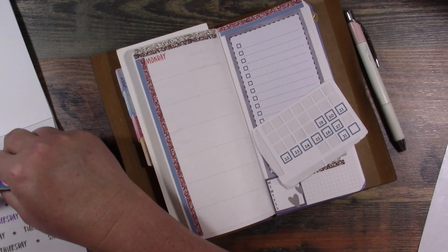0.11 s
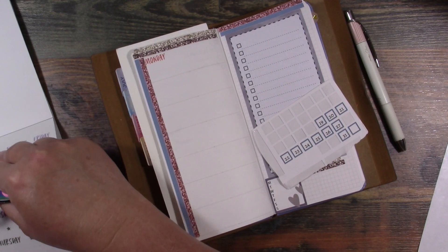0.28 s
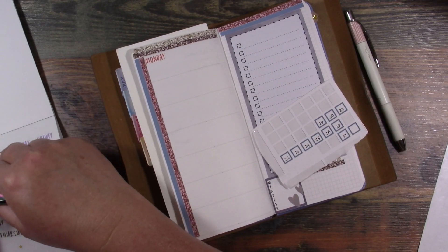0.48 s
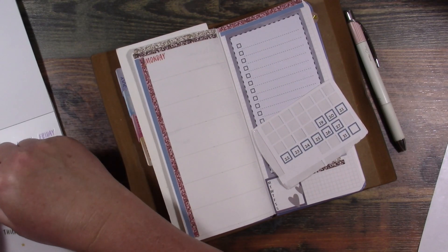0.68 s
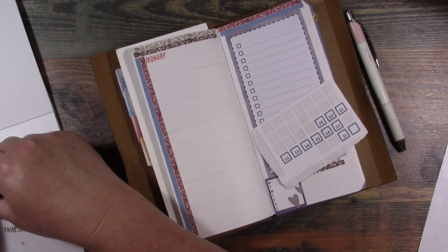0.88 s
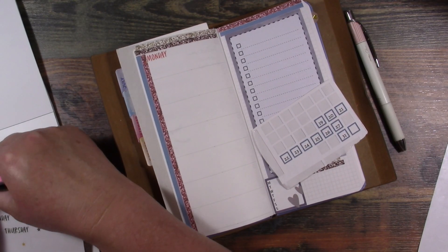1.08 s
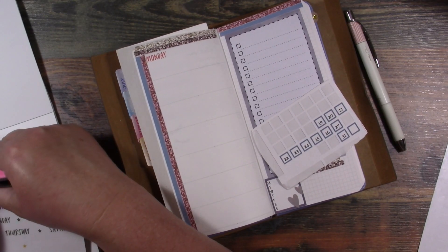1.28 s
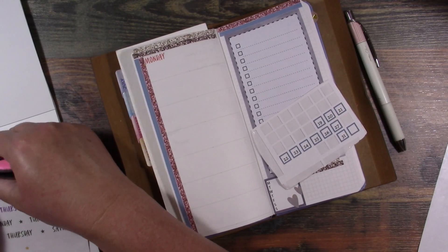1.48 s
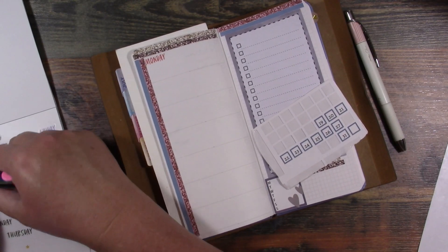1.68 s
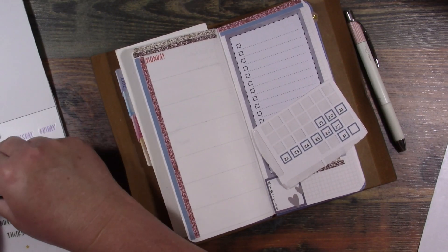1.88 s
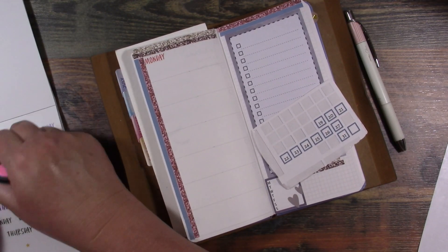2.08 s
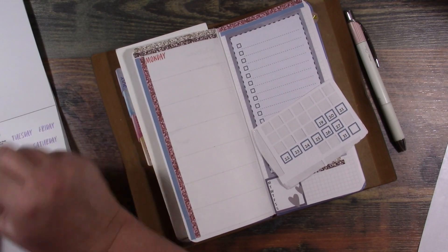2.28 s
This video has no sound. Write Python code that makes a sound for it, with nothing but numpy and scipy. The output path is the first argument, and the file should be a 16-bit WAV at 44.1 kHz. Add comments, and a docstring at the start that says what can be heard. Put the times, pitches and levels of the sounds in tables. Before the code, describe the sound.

Close paper handling at a desk: a few woody thumps first, faint rustling, then small crackly peels

```python
"""A small quiet room: at a wooden desk a hand works close by at paper and a padded book.
Knocks are short swelling tones with a noisy edge; they echo and ring the desk top.
Between them fingers rub and paper hisses, both made of filtered random grains and noise.
Paper snaps are bright noise bursts; a paper edge sings as it drags and glue lets go in tiny clicks.
Presses of the hand wake low tones under the desk, and a steady room tone lies below it all."""
import sys
import numpy as np
from scipy import signal
from scipy.fft import rfft, irfft
from scipy.io import wavfile

SR = 44100
rng = np.random.default_rng(int(sys.argv[2]) if len(sys.argv) > 2 else 0)


def volts(x):
    """Linear amplitude factor 10**(x/20) for a level x in dB, scalar or array-like."""
    e = np.asarray(x, float) / 20
    return 10 ** e


def wrap_up_sound(samples):
    """Save the sound to the file named by the first command line argument, as 16-bit audio."""
    columns = np.atleast_2d(samples).T
    # keep every value between -1 and 1, then stretch to whole-number steps
    tamed = np.clip(columns, -1, 1)
    steps = np.round(tamed * 32767).astype(np.int16)
    wavfile.write(sys.argv[1], SR, steps)


N = 101430  # length of the scene in samples


def read(points, hz):
    """Looks up a table between its points, with pitch on a log scale."""
    f, value = np.transpose(points)
    return np.interp(np.log(hz + 1), np.log(f + 1), value)


def evened(x):
    """Scales a sound to an average (rms) strength of 1."""
    return x / np.sqrt(np.mean(x ** 2) + 1e-20)


def colour(x, points):
    """Makes each pitch louder or softer, following a table of (pitch, level)."""
    size = x.shape[-1]
    gain = volts(read(points, np.fft.rfftfreq(size, 1 / SR)))
    return irfft(rfft(x) * gain, size)


def add(mix, s, sound):
    """Mixes a sound in at time s."""
    part = mix[round(s * SR):][:len(sound)]
    part += sound[:len(part)]


def grains(per_s, spread_db):
    """Random single-sample clicks of uneven strength, about per_s of them each second."""
    uneven = volts(spread_db * np.minimum(rng.exponential(1, N), 3))
    present = rng.random(N) < per_s / SR
    return rng.standard_normal(N) * uneven * present


# the tones in which the desk top rings:
# (pitch [Hz], level against the other tones [dB], time to fade by 60 dB [s])
DESK_TONES = [(407.6, 3.5, 0.044), (563, 2.5, 0.047), (692, -11.5, 0.2), (813, 6.5, 0.058),
              (1012, 8.5, 0.035), (1177, -9, 0.055), (1237, -0.5, 0.11), (1455, -4.5, 0.16),
              (1666, 8, 0.055), (1880, 11, 0.026), (2296, 6.5, 0.042)]


def desk(x):
    """Whatever pushes the desk top rings the same wooden tones, which then fade."""
    t = np.arange(SR // 4) / SR
    ring = sum(volts(db - 60 * t / fade) * np.sin(2 * np.pi * hz * t) for hz, db, fade in DESK_TONES)
    return signal.fftconvolve(x, ring / np.linalg.norm(ring))[:N]


# loudness of the sliding fingers: (time [s], level of the rub [dB], level of the paper hiss [dB])
SLIDE = [(0, -58, -57), (.1, -59.5, -60.5), (0.166, -62, -53.5), (0.2, -80, -55), (0.273, -56, -53.5),
         (0.311, -60.5, -68.5), (0.488, -56, -56), (.58, -51.5, -50), (0.658, -51, -66), (.92, -89, -64.5),
         (0.968, -52, -69), (1.04, -51.5, -63.5), (1.15, -52.5, -62.5), (1.22, -62.5, -69),
         (1.38, -59, -64), (1.45, -54.5, -57), (1.6, -74, -62.5), (1.65, -57, -58), (1.72, -94, -64.5),
         (1.8, -56, -61), (1.97, -59, -69.5), (2.12, -56, -54.5), (2.17, -58, -66.5), (2.3, -71, -61.5)]
# colour of the rub before the desk rings: (pitch [Hz], relative level [dB per Hz])
RUB_COLOUR = [(200, -10), (400, 3), (800, 2), (1600, 0), (2500, -5.5), (4000, -30.5)]
# colour of the hiss: (pitch [Hz], relative level [dB per Hz])
HISS_COLOUR = [(880, -48), (1500, -9.5), (2250, -10.5), (6760, -16), (11800, -22), (16000, -40)]


def sliding():
    """Small slips of skin on paper: a dull rub into the desk and a fine hiss."""
    s, rub_db, hiss_db = np.transpose(SLIDE)
    t = np.arange(N) / SR
    slips = grains(per_s=3400, spread_db=4.5)
    rub = evened(colour(slips, RUB_COLOUR))
    rub = evened(rub + evened(desk(rub)))  # rub and desk ring in equal parts
    hiss = evened(colour(rng.standard_normal(N) + 0.56 * evened(slips), HISS_COLOUR))
    return volts(np.interp(t, s, rub_db)) * rub + volts(np.interp(t, s, hiss_db)) * hiss


# colour of the room tone: (pitch [Hz], relative level [dB per Hz])
AIR_COLOUR = [(20, -33), (146, -11), (216, -5.5), (513, -6), (802, -10), (949, -11), (1330, -17.5),
              (2080, -23), (16000, -50.5)]
# how alike the left and right room tones are: (pitch [Hz], likeness [0 to 1])
LIKENESS = [(60, 0.81), (250, 0.75), (1000, 0.77), (4000, 0.48), (15000, 1)]


def air():
    """Steady room tone: filtered noise, partly shared by left and right."""
    level_db = -55
    a, b = rfft(rng.standard_normal((2, N)))
    same = np.clip(read(LIKENESS, np.fft.rfftfreq(N, 1 / SR)), -1, 1)
    right = same * a + np.sqrt(1 - same ** 2) * b
    pair = irfft(np.array([a, right]), N)
    return volts(level_db) * evened(colour(pair, AIR_COLOUR))


# how fast the room falls silent: (pitch [Hz], time to fade by 60 dB [s])
ROOM_FADE = [(250, 0.31), (660, 0.21), (1740, 0.27), (4590, 0.28), (12000, 0.083)]


def room(x):
    """Scattered reflections of random sign, each pitch range dying at its own speed."""
    start_s, spacing, width = 0.006, 40, 1  # first reflection, samples per reflection, stereo width
    taps = np.zeros((2, SR // 2))
    at = np.arange(round(start_s * SR), SR // 2 - spacing, spacing)
    at = at + rng.integers(0, spacing, (2, len(at)))
    np.put_along_axis(taps, at, rng.choice([-1., 1.], at.shape), 1)
    hz, t, z = signal.stft(taps, SR, nperseg=128)
    fading = volts(-60 * t / read(ROOM_FADE, hz)[:, None])
    mid, side = signal.istft(z * fading, SR, nperseg=128)[1]
    tail = np.array([mid + width * side, mid - width * side])
    return signal.fftconvolve(x[None], tail / np.linalg.norm(tail[0]), axes=1)[:, :N]


# knocks and snaps; the levels are before the gains added below:
# (time [s], low thud [dB], middle knock [dB], high clack [dB], hard edge [dB])
KNOCKS = [(0.2128, -32, -41.5, -66, -83), (0.2219, -39, -37.5, -40.5, -44), (0.2441, -21, -28, -40.5, -72),
          (0.397, -20.5, -24.5, -25, -54), (.4695, -77, -47.5, -52, -52), (0.6065, -13, -20, -23.5, -37),
          (0.7712, -23.5, -21.5, -14, -27.5), (.955, -48, -49, -48, -59), (.941, -55, -52.5, -51, -71),
          (1.034, -47, -51, -44, -46), (1.1425, -49, -48, -42.5, -50.5), (1.408, -32.5, -34.5, -31.5, -72),
          (1.739, -64, -61, -49, -58), (1.773, -41.5, -48.5, -45, -75), (1.9845, -48, -60, -49, -70),
          (2.0069, -44.5, -45, -34, -54), (2.022, -36.5, -37, -35.5, -44), (2.0552, -43, -42.5, -37.5, -54),
          (2.1325, -44, -46, -40, -64), (2.1365, -34.5, -39.5, -36.5, -56)]
# the three broad tones of a blow on the padded book: (pitch [Hz], cycles to swell [count], gain [dB])
BLOW_TONES = [(414.4, 0.42, 4.5), (779, 0.65, 12.5), (1493, 0.7, 12)]


def blows():
    """Each broad tone swells and dies at once; a high-pass keeps the bass low, as a small microphone would."""
    out, t = np.zeros(N), np.arange(1500) / SR
    for k, (hz, cycles, gain_db) in enumerate(BLOW_TONES):
        u = t * hz / cycles  # the swell peaks at u = 1
        swell = (u * np.exp(1 - u)) ** 3
        tone = -volts(gain_db) * swell * np.sin(2 * np.pi * hz * t)
        for row in KNOCKS:
            add(out, row[0], volts(row[1 + k]) * tone)
    floor_hz = 339
    return signal.sosfilt(signal.butter(4, floor_hz, "high", fs=SR, output="sos"), out)


# first reflections off the desk top and things near it: (delay [s], level [dB])
ECHOES = [(.00164, -4.5), (.0047, -11.5), (.0085, -11.5)]


def echoed(direct):
    """The knocks together with a few early, softer copies of themselves."""
    out = direct.copy()
    for s, db in ECHOES:
        add(out, s, volts(db) * direct)
    return out


def burst(length):
    """Loudness shape: a quick rise, then a fade that falls to about a third every length seconds."""
    rise_s = 0.00037
    t = np.arange(2048) / SR
    return np.minimum(t / rise_s, 1) * np.exp(-t / length)


# colour of the hard edge of a knock: (pitch [Hz], relative level [dB per Hz])
CRACK_COLOUR = [(1500, -13.5), (2500, -8), (3600, -10), (5500, -16), (8000, -29.5), (14000, -44)]


def cracks():
    """The hard edge of each knock: a short dull burst of noise."""
    length_s, gain_db = 0.0033, 1.5
    shape = np.zeros(N)
    for row in KNOCKS:
        add(shape, row[0], volts(row[4] + gain_db) * burst(length_s))
    return shape * evened(colour(rng.standard_normal(N), CRACK_COLOUR))


# slow low voices of the air under the desk and its frame:
# (final pitch [Hz], swell time [s], time to fade by 60 dB [s], level against the press [dB])
HOLLOW_TONES = [(315, 0.017, 0.17, 1.5), (179, 0.0045, 0.068, -9.5)]
# presses of the hand that wake the hollow under the desk: (time [s], level [dB])
PRESSES = [(0.2401, -33.5), (0.3972, -32), (0.6071, -27.5), (1.574, -42.5)]


def hollow():
    """Low tones that build up after a press, climb to pitch and fade."""
    droop, rise_s = 0.284, 0.021  # share by which a tone starts flat, time of its climb
    out, t = np.zeros(N), np.arange(SR // 4) / SR
    bent = t - droop * rise_s * (1 - np.exp(-t / rise_s))
    tone = np.zeros(len(t))
    for hz, swell, fade, db in HOLLOW_TONES:
        build_up = 1 - np.exp(-(t / swell) ** 2)
        tone += volts(db - 60 * t / fade) * build_up * np.sin(2 * np.pi * hz * bent)
    for s, db in PRESSES:
        add(out, s, volts(db) * tone)
    return out


# crisp paper ticks: (time [s], level [dB], fade length [s], pitch that is lifted [Hz])
TICKS = [(0.608, -37, 0.0025, 8500), (1.361, -51, 0.0012, 9100), (1.409, -27, 0.0041, 6570),
         (1.897, -49.5, 0.0026, 10900), (1.985, -43.5, 0.0042, 6750), (2.01, -35.5, 0.0022, 4670),
         (2.0224, -28.5, 0.00072, 9300), (2.035, -39, 0.002, 6840), (2.0545, -28.5, 0.0026, 3670),
         (2.077, -35, 0.0029, 13300), (2.129, -39, 0.0017, 5040), (2.1304, -35.5, 0.0077, 3400)]
# colour common to all ticks: (pitch [Hz], relative level [dB per Hz])
TICK_COLOUR = [(1500, -10), (2500, -2), (4000, -3), (8000, -8), (13000, -10.5), (16000, -32)]


def ticks():
    """Paper fibres and glue let go in bright bursts, each with its own colour."""
    lift_db, lift_width = 10, 0.12  # the width is a share of the pitch
    out, f = np.zeros(N), np.fft.rfftfreq(2048, 1 / SR)
    for (s, db, length, hz), noise in zip(TICKS, rng.standard_normal((len(TICKS), 2048))):
        lift = volts(lift_db * np.exp(-((f / hz - 1) / lift_width) ** 2))
        bright = evened(colour(irfft(rfft(noise) * lift), TICK_COLOUR))
        add(out, s, volts(db) * burst(length) * bright)
    return out


# a paper edge drags and sings close to one desk tone: (start [s], length [s], level [dB])
DRAGS = [(1.773, .075, -56), (2.108, .028, -54)]


def drags():
    """Rough noise in a narrow range of pitch while the edge scrapes."""
    pitch_hz, width_hz = 1900, 140
    shape = np.zeros(N)
    for s, length, db in DRAGS:
        add(shape, s, volts(db) * signal.windows.tukey(round(length * SR)))
    off = (np.fft.rfftfreq(N, 1 / SR) - pitch_hz) / width_hz
    narrow = irfft(rfft(rng.standard_normal(N)) / (1 + (2 * off) ** 2), N)
    return shape * evened(narrow)


# glue lets go in dense small grains: (start [s], length [s], level [dB])
PEELS = [(2, 0.1, -56), (2.108, 0.032, -65.5)]
# colour of the parting glue: (pitch [Hz], relative level [dB per Hz])
PEEL_COLOUR = [(1500, -12), (2200, -23), (3550, 1), (4600, -8), (15000, -12)]


def peels():
    """Parting glue: a dense run of tiny uneven clicks."""
    shape = np.zeros(N)
    for s, length, db in PEELS:
        add(shape, s, volts(db) * signal.windows.tukey(round(length * SR), .3))
    return shape * evened(colour(grains(per_s=3800, spread_db=2.5), PEEL_COLOUR))


def scene():
    """Hand, paper and desk, their room, the hollow under the desk and the room tone."""
    ring_db, room_db = -10.5, -9
    direct = blows()
    knocks = echoed(direct) + volts(ring_db) * desk(direct) + cracks()
    near = knocks + ticks() + sliding() + drags() + peels()
    return near + volts(room_db) * room(near) + hollow() + air()


def low_pass(x):
    """Removes everything above the highest recorded frequency."""
    return signal.sosfilt(signal.butter(12, 16500, fs=SR, output="sos"), x)


# how the microphone pair leans to one side: (pitch [Hz], left over right [dB])
LEAN = [(60, .2), (150, 2.2), (400, 1.4), (1000, .5), (15000, .2)]


def record(dry):
    """A microphone pair that leans a little: half the lean lifts the left, half lowers the right."""
    left_lift = [(hz, db / 2) for hz, db in LEAN]
    right_cut = [(hz, -db / 2) for hz, db in LEAN]
    pair = np.array([colour(dry[0], left_lift), colour(dry[1], right_cut)])
    return low_pass(pair)


dry = scene()
out = record(dry)
wrap_up_sound(out)
```